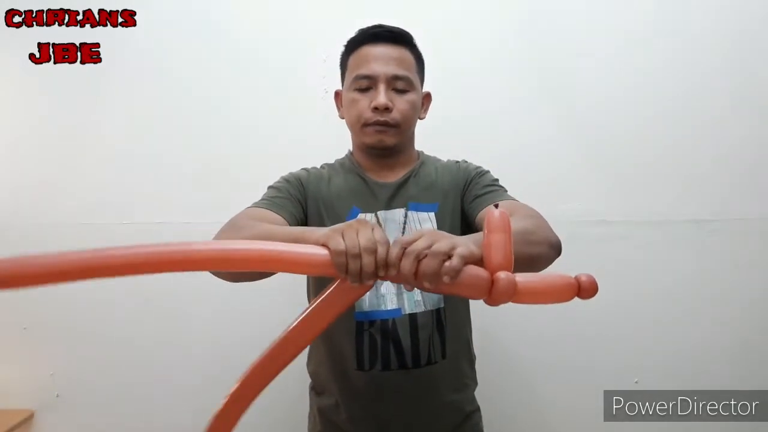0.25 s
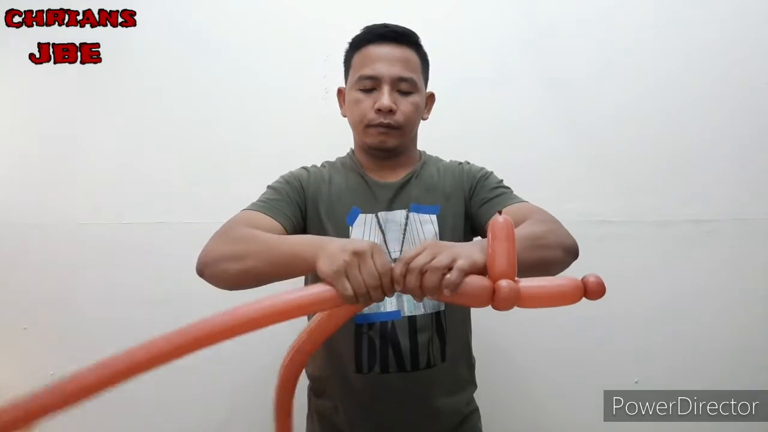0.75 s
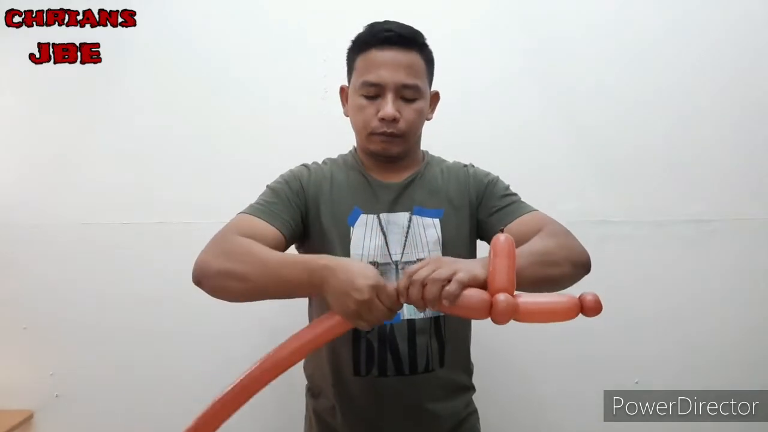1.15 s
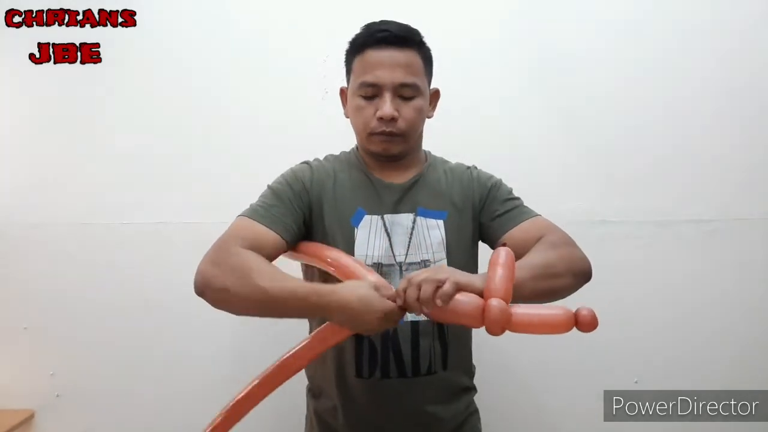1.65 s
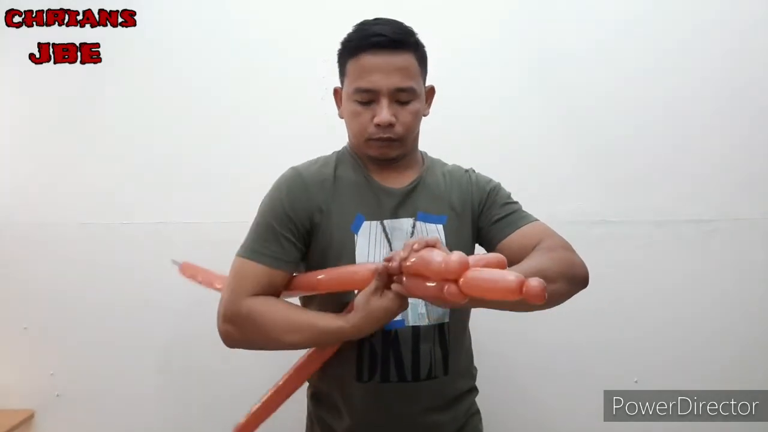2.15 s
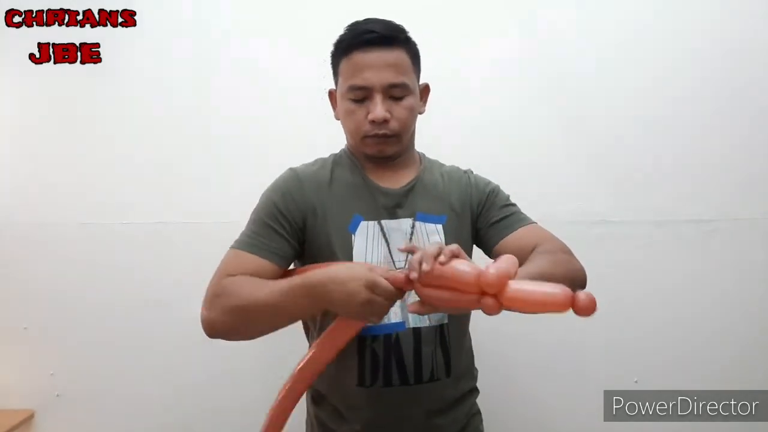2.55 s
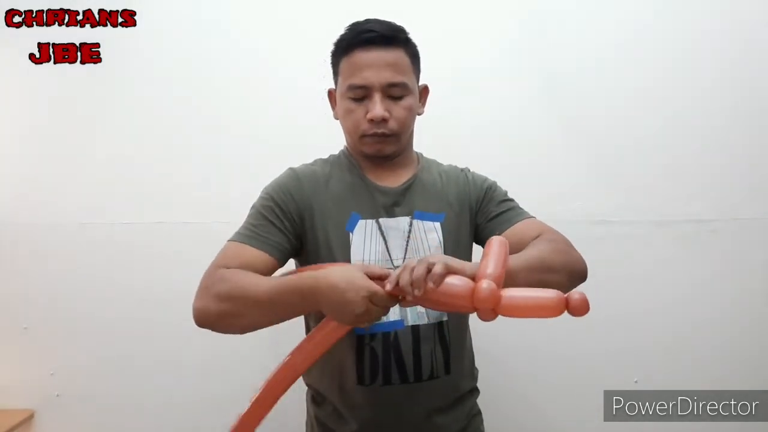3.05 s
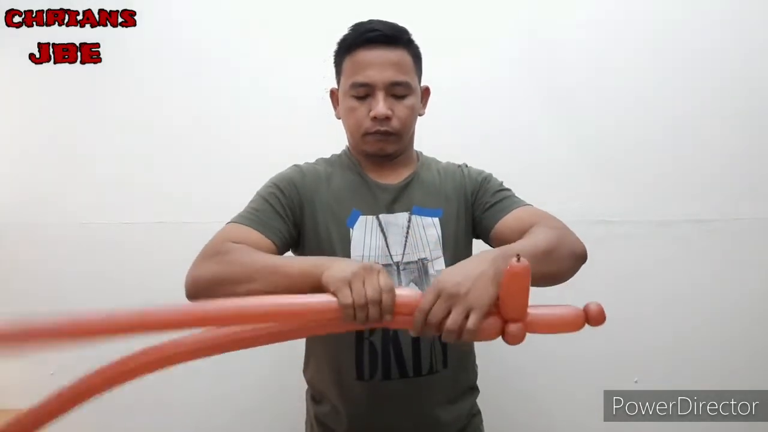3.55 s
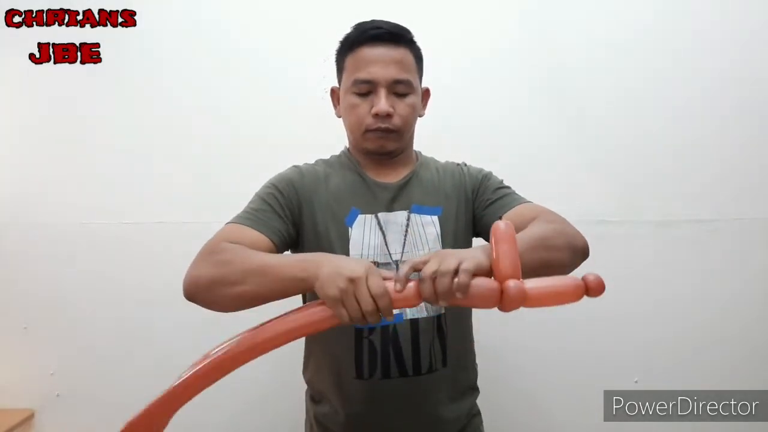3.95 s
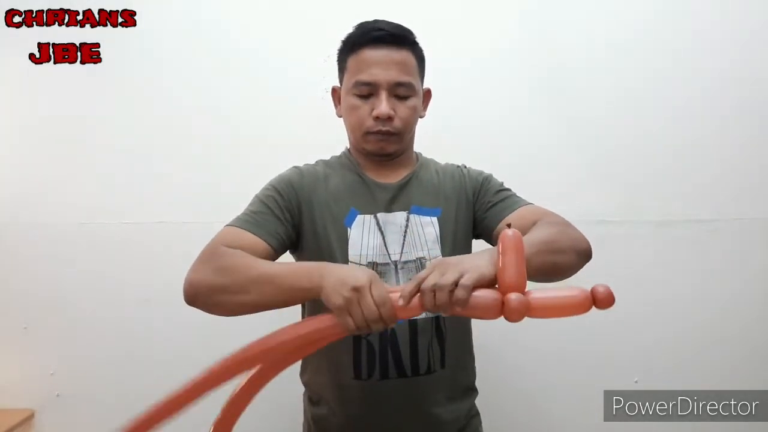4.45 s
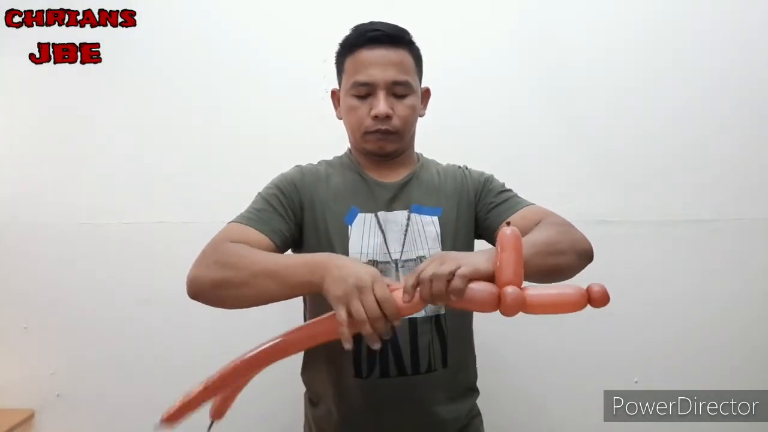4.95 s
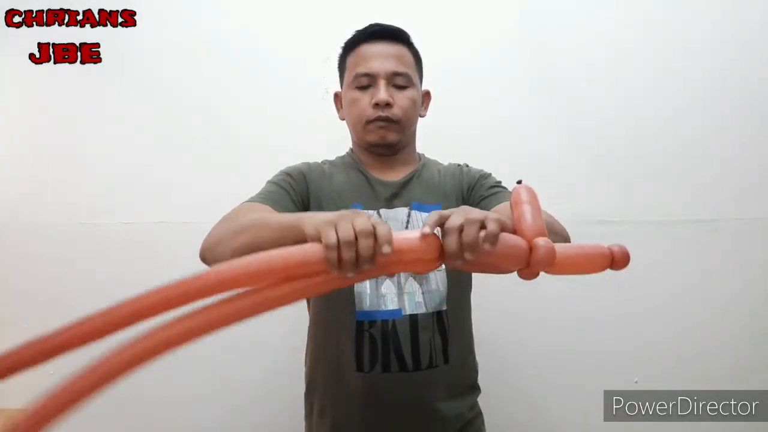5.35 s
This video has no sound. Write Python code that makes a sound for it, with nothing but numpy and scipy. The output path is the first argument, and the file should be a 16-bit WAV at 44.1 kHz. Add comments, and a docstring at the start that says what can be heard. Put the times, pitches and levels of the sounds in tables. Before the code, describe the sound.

Long balloons are twisted by hand in a bare room: sharp rubbery snaps, short creaks, hollow thumps and hissy rubbing in uneven bursts.

```python
"""A bare, hard-walled room: two long latex balloons are twisted by hand, a few steps from a stereo microphone.
Taut rubber sticks and lets go: bursts of kicks and small slips ring damped modes as snaps with short creaks.
Jolts drum the inflated tubes as broad low resonances; rubbing fingers are shaped noise and sparse random slips.
Thin squeaks are drifting sines. Random decaying echoes answer all of these but the hiss, over a quiet room tone."""
import sys
import numpy as np
from scipy import signal
from scipy.fft import rfft, irfft, next_fast_len
from scipy.io import wavfile
from scipy.ndimage import map_coordinates

SR = 44100
rng = np.random.default_rng(int(sys.argv[2]) if len(sys.argv) > 2 else 0)


def amplitude_ratio(level_db):
    """Convert a level in decibels to the matching linear amplitude (field) ratio."""
    exponent = np.asarray(level_db, float) / 20
    return 10 ** exponent


def waveform_to_disk(signal):
    """Save audio, clipped to [-1, 1], as 16-bit WAV at the path in sys.argv[1]."""
    frames = np.transpose(np.atleast_2d(signal))
    scaled = np.clip(frames, -1, 1) * 32767
    samples = np.round(scaled).astype(np.int16)
    wavfile.write(sys.argv[1], SR, samples)


N = 246222
LEAD = SR // 10  # samples kept ahead of t = 0 for a snap already under way

# room tone spectrum, relative: f/Hz, density/dB per Hz
AIR_SPECTRUM = [(15, -21), (25, 11), (170, -8.5), (217, -2.5), (344, -15), (607, -22), (863, -25.5),
                (1520, -24.5), (3500, -32), (5880, -42.5), (8140, -25), (9570, -26), (14800, -22),
                (16000, -29)]
# left-right likeness of room tone and hiss: f/Hz, likeness/0..1
NOISE_LIKENESS = [(60, 0.33), (300, 0.64), (1000, .2), (7000, 0.019)]
# reverberation: f/Hz, t60/s
ROOM_T60 = [(150, 0.21), (270, 0.22), (450, 0.37), (1000, 0.27), (2800, 0.25), (7000, 0.25), (14000, 0.2)]
# left-right likeness of the echoes: f/Hz, likeness/0..1
ECHO_LIKENESS = [(100, 0.66), (300, 0.87), (700, 0.42), (2000, 0.14), (8000, 0.08)]
# fingers sliding on latex: t/s, hiss level before flutter/dB
SLIDE = [(0.0, -74), (0.23, -54.5), (0.42, -99), (0.8, -78.5), (1.35, -65.5), (1.75, -62), (1.94, -49),
         (2.3, -48.5), (2.42, -43), (2.83, -37), (3.04, -92.5), (3.35, -61.5), (3.41, -38.5), (3.71, -71),
         (4.12, -63.5), (4.4, -73), (4.68, -72), (4.85, -62.5), (5.0, -45.5), (5.15, -72), (5.58, -66)]
# sliding hiss spectrum, relative: f/Hz, density/dB per Hz
HISS_SPECTRUM = [(1470, -31), (2500, -40), (4310, -18), (5230, -21.5), (7950, -9), (9440, -9.5),
                 (14900, -8.5), (16000, -34)]
# scrape spectrum, relative: f/Hz, density/dB per Hz
SCRAPE_SPECTRUM = [(290, -40), (430, -32), (540, -15), (680, -18.5), (1710, -1), (3570, -7.5), (6000, -9),
                   (7800, -59), (13200, -120)]
# thin squeaks: start/s, swell/s, pitch/Hz, peak before roughness/dB, glide/Hz per s
SQUEAKS = [(0.21, 0.06, 2190, -66, 0), (3.62, 0.03, 1068, -54, -40), (4.365, 0.075, 1060, -63.5, 250),
           (5.32, 0.03, 2300, -32, -1200)]
# inflated tubes jolted like drums: t/s, jolt level/dB, pitch/Hz, width/share of pitch (limited in use)
THUMPS = [(0.115, -8, 643, 0.21), (1.545, -12.5, 254, 0.27), (1.579, -14.5, 268, 0.39),
          (1.598, -16.5, 91, 1.4), (1.692, -14, 320, 0.46), (2.393, 16, 693, 0.48), (2.412, -7.5, 126, 1.7),
          (2.439, 4, 547, 0.6), (2.549, -25, 715, 0.65), (3.011, 2, 575, 0.22), (3.195, 12.5, 555.6, 0.57),
          (3.404, 20.5, 260, 0.15), (3.417, 13, 255, 0.22), (3.425, 11, 125, 1.8), (3.439, 9, 452, 0.37),
          (3.459, 5, 253, 0.37), (3.541, 2, 450, 0.4), (3.555, 0, 225, 0.56), (3.592, 3.5, 433, 0.48),
          (3.64, -4, 480, 0.387), (3.893, -12, 727, 0.47), (4.098, 1, 552, 0.33), (4.121, 2, 280, 0.68),
          (4.135, 5.5, 184, 0.23), (4.343, -13, 437, 1.47), (4.635, -2.5, 364, 0.48), (5.036, 0, 465, 0.86),
          (5.075, 2, 243, 1.03), (5.301, 12.5, 255, 0.44)]
# rubber letting go: t/s, kick/dB, neck ring/Hz, crack over ring/dB, nominal creak over kick/dB
SNAPS = [(-0.069, -1.5, 1080, 9, -21), (0.11, -18, 1830, -4.5, 12.5), (0.432, -36.5, 3700, 0, 2),
         (0.61, -54, 2550, -24, 6.5), (0.708, -39, 1090, -4.5, 1.5), (0.759, -32.5, 3360, -4.5, -2.5),
         (0.903, -43.5, 1660, -3.5, -8.5), (1.249, -45, 2420, 3.5, 9.5), (1.752, -40, 1120, -0.5, 9),
         (1.914, -30, 2000, -34, -1.5), (1.993, -28.5, 1870, 12.5, 1), (2.24, -12, 1930, 0.5, -0.5),
         (2.251, -9, 1850, -5, 7), (2.287, -8, 1760, -8.5, 5.5), (2.301, -8, 1930, -2, -11),
         (2.367, -22.5, 2100, 18.5, -17), (2.3935, 7.5, 1450, -1, -10), (2.43, 6, 1900, -1, -7),
         (2.55, 8.5, 1440, -2.5, -2), (2.656, -35, 1700, 18, -16.5), (2.683, 9, 1800, -2.5, -5.5),
         (2.809, -31, 1530, 3, 2), (2.99, -20, 1430, 7.5, -0.5), (3.013, -11.5, 1080, -8, -3.5),
         (3.166, -7, 1640, -22.5, -5), (3.195, -4.5, 1530, -28, -1.5), (3.401, -14.5, 1360, 9, 8),
         (3.412, 5, 1770, -10, -6.5), (3.542, -20, 1030, -9, 10), (3.585, -12, 1580, -31.5, 11),
         (3.643, -13.5, 1100, 4, -6), (3.894, -18.5, 1650, -27.5, 9), (3.942, -16.5, 2040, -31.5, -11.5),
         (4.088, -23.5, 863, -14, -5), (4.098, -14.5, 1500, -3.5, 5.5), (4.109, -26, 1570, 12, 5),
         (4.346, -46, 992, 7.5, 7.5), (4.626, -14.5, 1630, 1, 7.5), (4.825, -28, 2080, 2.5, 0.5),
         (4.872, -33, 2010, 6.5, -7.5), (4.947, -43, 3860, 5.5, 17.5), (4.998, -44.5, 2230, 9.5, 9.5),
         (5.02, -25, 2260, 4, 12), (5.037, -5.5, 1750, -2.5, 0.5), (5.278, 5.5, 1615, -9, 6.5),
         (5.29, 9, 1564, -11, 3)]
# balance of snaps, thumps and squeaks: f/Hz, left over right/dB
LEFT_OVER_RIGHT = [(100, 3.5), (300, 2), (2000, 2.4), (5000, 4.3), (9000, 3), (13000, -2)]
# microphone response: f/Hz, gain/dB
MIC_RESPONSE = [(20, -42), (35, -20), (50, 3), (150, 6.5), (500, 11), (3000, 5.5), (6300, -2), (8100, 3),
                (9600, -9.5), (12500, -7), (15200, -9.5), (16400, -28)]


def unit(x):
    """x at rms 1."""
    return x / np.sqrt(np.mean(x ** 2) + 1e-20)


def along(points, f_hz):
    """Interpolates (f/Hz, value) points on a log frequency axis."""
    f, value = np.transpose(points)
    return np.interp(np.log(f_hz + 1), np.log(f + 1), value)


def curves(rows):
    """One value per sample for each column after the time."""
    t_s, *columns = np.transpose(rows)
    return [np.interp(np.arange(N) / SR, t_s, column) for column in columns]


def wobble(knots_per_s):
    """A smooth random curve through unit-variance knots."""
    knots = rng.standard_normal(int(N * knots_per_s / SR) + 4)
    return map_coordinates(knots, [np.arange(N) * knots_per_s / SR])


def filtered(x, response):
    """x times a complex response of frequency."""
    size = next_fast_len(x.shape[-1] + 4096)
    spectrum = rfft(x, size) * response(np.fft.rfftfreq(size, 1 / SR))
    return irfft(spectrum, size)[..., :x.shape[-1]]


def causal(gain):
    """The minimum-phase response with this gain, by folding the cepstrum."""
    cepstrum = irfft(np.log(gain + 1e-6))
    count = cepstrum.shape[-1]
    cepstrum = cepstrum * np.where(np.arange(count) < count // 2, 2, 0)
    cepstrum[..., 0] /= 2
    return np.exp(rfft(cepstrum))


def resonance(f, centre_hz, width_hz):
    """One damped mode, gain 1 at its centre."""
    damping = 1j * f * width_hz
    return damping / (centre_hz * centre_hz - f * f + damping + 1e-9)


def paired(x, likeness):
    """Left and right of set likeness from two unrelated signals on the second-last axis."""
    def mix(f):
        angle = np.arccos(np.clip(along(likeness, f), 0, 1)) / 2
        return np.array([np.cos(angle), np.sin(angle)])
    y = filtered(x, mix)
    mid, side = y[..., 0, :], y[..., 1, :]
    return np.stack([mid + side, mid - side], -2)


def noise(spectrum, likeness):
    """Shaped stereo noise of rms 1."""
    coloured = filtered(rng.standard_normal((2, N)), lambda f: amplitude_ratio(along(spectrum, f)))
    return unit(paired(coloured, likeness))


def room(echo_db, count):
    """Fresh stereo answers: direct sound, spiky wall echoes, then a dense tail that dies by frequency."""
    t_s = np.arange(SR * 2 // 5) / SR
    spikes = amplitude_ratio(5.5 * np.exp(-t_s / 0.086) * rng.standard_normal((count, 2, len(t_s))))
    f, frame_s, z = signal.stft(spikes * rng.standard_normal(spikes.shape), SR, nperseg=256)
    decay = amplitude_ratio(-60 * frame_s / along(ROOM_T60, f)[:, None])
    tail = signal.istft(z * decay, SR, nperseg=256)[1][..., :len(t_s)]
    tail = paired(tail * np.clip((t_s - 0.002) / 0.0014, 0, 1), ECHO_LIKENESS)
    energy = np.mean(np.sum(tail ** 2, -1), -1)
    tail = amplitude_ratio(echo_db) * tail / np.sqrt(energy)[:, None, None]
    tail[..., 0] += 1  # direct sound
    return tail


def in_room(x, echo_db):
    """A mono track heard through one room answer."""
    return signal.fftconvolve(x[None], room(echo_db, count=1)[0], axes=1)[:, :N]


def placed(times_s, dry, echo_db):
    """Each sound with its own room answer, laid out in time."""
    wet = signal.fftconvolve(dry[:, None], room(echo_db, count=len(dry)), axes=2)
    out = np.zeros((2, N + SR))
    for t_s, sound in zip(times_s, wet):
        out[:, LEAD + round(t_s * SR):][:, :sound.shape[1]] += sound
    return out[:, LEAD:LEAD + N]


def room_tone():
    """Steady shaped noise with a slow level wander, louder on the left."""
    left_over_right_db = 7.5 * np.array([[0.5], [-0.5]])
    return amplitude_ratio(-70 + wobble(1.3) + left_over_right_db) * noise(AIR_SPECTRUM, NOISE_LIKENESS)


def settling(peak_db, peak_s):
    """A swell and fade after each snap, at peak_db once peak_s has passed."""
    since_s = np.arange(0, N, 64) / SR - np.transpose(SNAPS)[0, :, None]
    u = np.clip(since_s, 0, None) / peak_s
    swell = np.sum(amplitude_ratio(peak_db)[:, None] * u * np.exp(1 - u), 0)
    return np.repeat(swell, 64)[:N]  # held for 64 samples


def rubbing():
    """Sliding skin hisses; a firmer grip scrapes in tiny irregular slips, which the room blurs."""
    puff_db, puff_s = -39, 0.014  # skin hiss after a crack: over the crack, time to peak
    settle_db, settle_s = -51.5, 0.035  # skin scraping back into place: over the kick, time to peak
    scrape_over_hiss_db, slips_per_s, echo_db = -25.5, 500, 0.5
    slide_db, = curves(SLIDE)
    _, kick_db, _, crack_db, _ = np.transpose(SNAPS)
    grip = wobble(16)

    hiss_level = amplitude_ratio(slide_db) + settling(kick_db + crack_db + puff_db, puff_s)
    flutter = amplitude_ratio(0.63 * grip + 2.1 * wobble(51))
    hiss = hiss_level * flutter * noise(HISS_SPECTRUM, NOISE_LIKENESS)

    slips = rng.standard_normal(N) * (rng.random(N) < slips_per_s / SR)
    scrape = unit(filtered(slips, lambda f: causal(amplitude_ratio(along(SCRAPE_SPECTRUM, f)))))
    scrape_level = amplitude_ratio(slide_db + scrape_over_hiss_db) + settling(kick_db + settle_db, settle_s)
    scrape = scrape * amplitude_ratio(0.64 * grip) * scrape_level
    return hiss + in_room(scrape, echo_db)


def squeaks():
    """Regular stick-slip: a thin tone, uneven in strength, that swells, fades and is smeared by the room."""
    swell_db_per_s, fade_db_per_s, onset_s, echo_db = 60, 300, 0.0056, -9
    out = np.zeros(N)
    for start_s, swell_s, pitch_hz, peak_db, glide_hz_per_s in SQUEAKS:
        t_s = np.clip(np.arange(N) / SR - start_s, 0, 1)
        drop_db = np.maximum(swell_db_per_s * (swell_s - t_s), fade_db_per_s * (t_s - swell_s))
        rough_db = 3.5 * wobble(150)
        drift = 1 + 0.016 * wobble(120)
        phase = 2 * np.pi * np.cumsum((pitch_hz + glide_hz_per_s * t_s) * drift) / SR
        out += np.clip(t_s / onset_s, 0, 1) * amplitude_ratio(peak_db - drop_db + rough_db) * np.sin(phase)
    return in_room(out, echo_db)


def thumps():
    """A soft, shaky jolt rings the air in the tube and pushes deep bass."""
    t_s, jolt_db, pitch_hz, width = np.transpose(THUMPS)[..., None]
    width_hz = np.clip(width, 0.25, 1.5) * pitch_hz
    u = np.arange(SR // 8) / SR / 0.03  # the hand's squeeze shakes hardest after 10 ms
    shake = rng.standard_normal((len(t_s), len(u))) * u * np.exp(-3 * u)
    jolt = 0.5 * shake / np.linalg.norm(shake, axis=1, keepdims=True)
    jolt[:, 0] = 1
    deep_db = -13.5 - 11 * np.log2(pitch_hz / 250)  # fatter, lower tubes push more

    def colour(f):
        tube = resonance(f, pitch_hz, width_hz) ** 2
        return tube + amplitude_ratio(deep_db) * resonance(f, 125, 220) ** 2

    ring = filtered(jolt, colour)
    ring = ring * np.sqrt(width_hz / SR) / np.linalg.norm(ring, axis=1, keepdims=True)
    return placed(t_s[:, 0], amplitude_ratio(jolt_db) * ring, echo_db=3)


def released(creak_db, count):
    """Rubber tears loose in four kicks within about 2 ms, then creaks: slips of either sign that thin out."""
    draw = rng.random((len(creak_db), count, 3))
    creak_s = np.clip(0.05 * amplitude_ratio(0.2 * creak_db), 0.002, 0.1)  # louder creaks last longer
    when = (creak_s * SR * draw[..., 0] ** 1.5).astype(int) + SR // 500
    size = np.sign(draw[..., 1] - 0.5) * amplitude_ratio(3 * np.log(draw[..., 2] + 1e-3))
    size *= amplitude_ratio(-4.5 * draw[..., 0])  # late slips are weaker
    size *= amplitude_ratio(creak_db) / np.linalg.norm(size, axis=1, keepdims=True)
    # kicks take the place of the first four slips
    when[:, :4] = (np.arange(4) + draw[:, :4, 0]) * SR / 1800
    size[:, :4] = [0.65, -0.55, 0.4, -0.3]
    train = np.zeros((len(creak_db), SR // 7))
    np.add.at(train, (np.arange(len(creak_db))[:, None], when), size)
    return train


def snaps():
    """Every release rings the stretched neck and a tight skin mode, flicks the skin and cracks in the treble."""
    t_s, kick_db, ring_hz, crack_db, creak_db = np.transpose(SNAPS)[..., None]

    def colour(f):
        neck = resonance(f, ring_hz, 0.5 * ring_hz)
        flick = amplitude_ratio(-6.5) * resonance(f, 1.1 * ring_hz, 3.2 * ring_hz) ** 2
        tight_skin = amplitude_ratio(-13.5) * resonance(f, 2040, 200)
        crack = amplitude_ratio(crack_db) * resonance(f, 11000, 17000)
        return neck + flick + tight_skin - crack

    rung = filtered(released(creak_db, count=20), colour)
    return placed(t_s[:, 0], amplitude_ratio(kick_db) * rung, echo_db=4.5)


def scene():
    """Snaps, thumps, squeaks and rubbing, mostly a little to the left, over the room tone."""
    def balance(f):
        return amplitude_ratio(along(LEFT_OVER_RIGHT, f) * [[0.5], [-0.5]])
    hands = filtered(snaps() + thumps() + squeaks(), balance)
    return room_tone() + rubbing() * amplitude_ratio([[1.4], [-1.4]]) + hands


def roll_off(x):
    """The treble ends steeply here."""
    return signal.sosfilt(signal.butter(12, 16430, fs=SR, output="sos"), x)


def record(dry):
    """A small microphone with a port resonance near 8 kHz, as a minimum-phase filter."""
    mix = filtered(dry, lambda f: causal(amplitude_ratio(along(MIC_RESPONSE, f))))
    return roll_off(mix)


dry = scene()
out = record(dry)
waveform_to_disk(out)
```